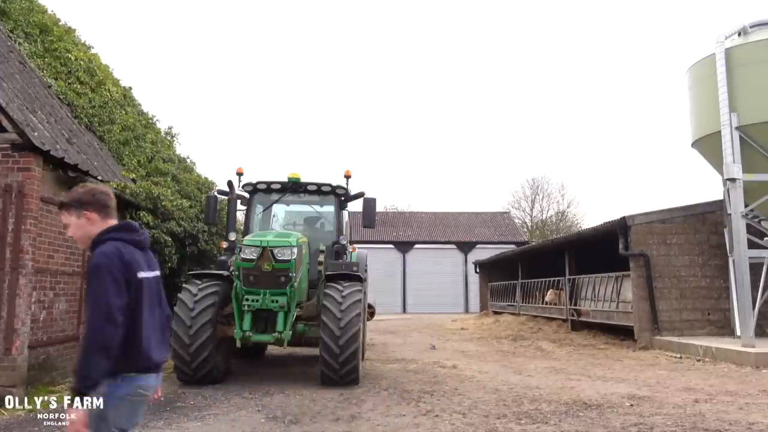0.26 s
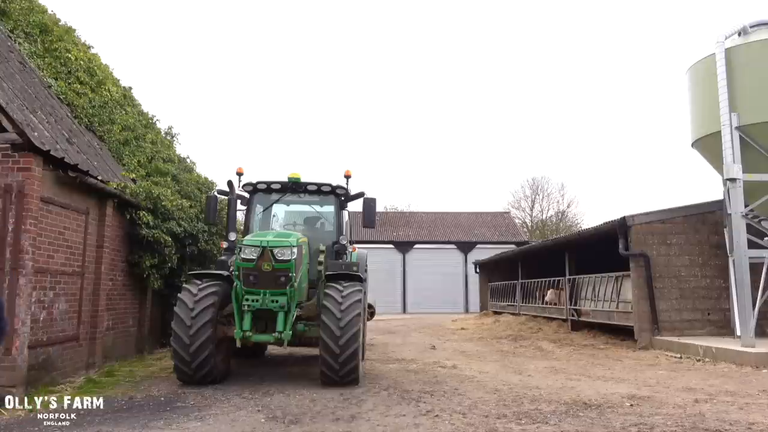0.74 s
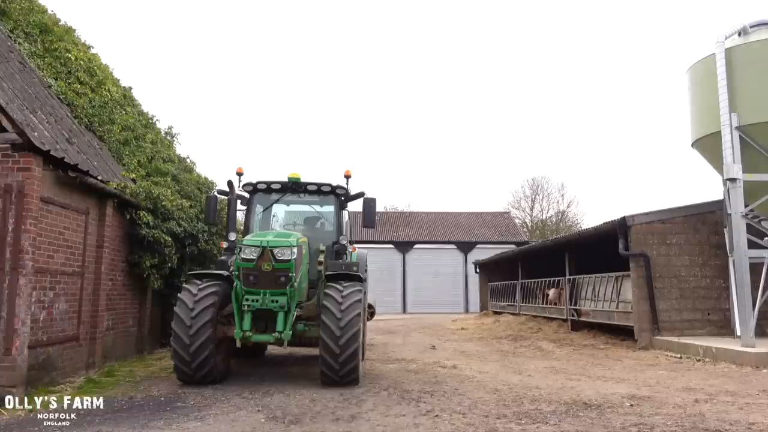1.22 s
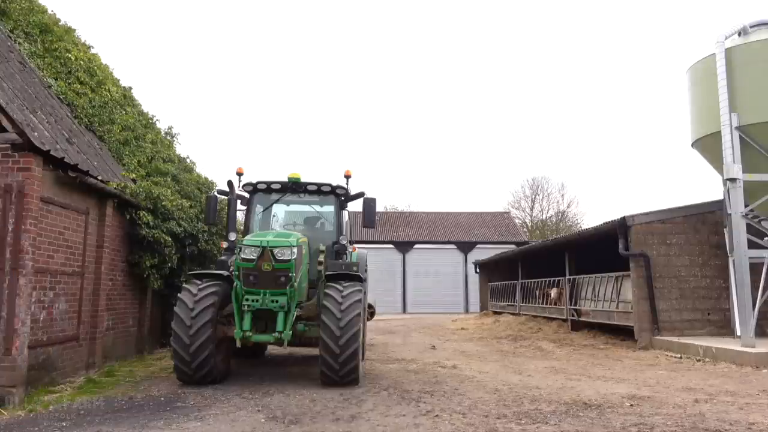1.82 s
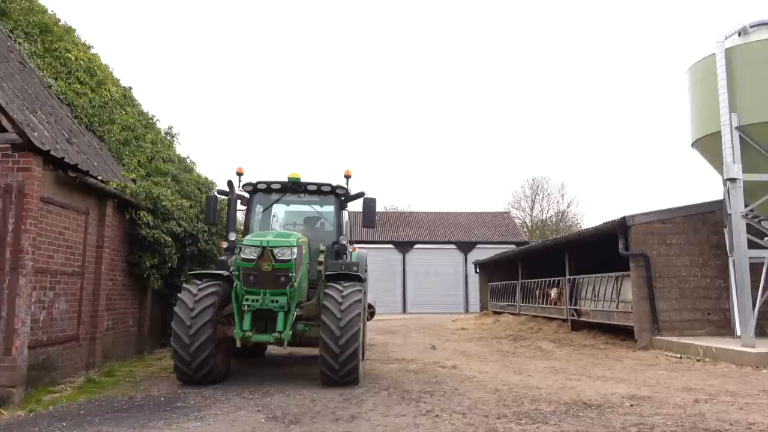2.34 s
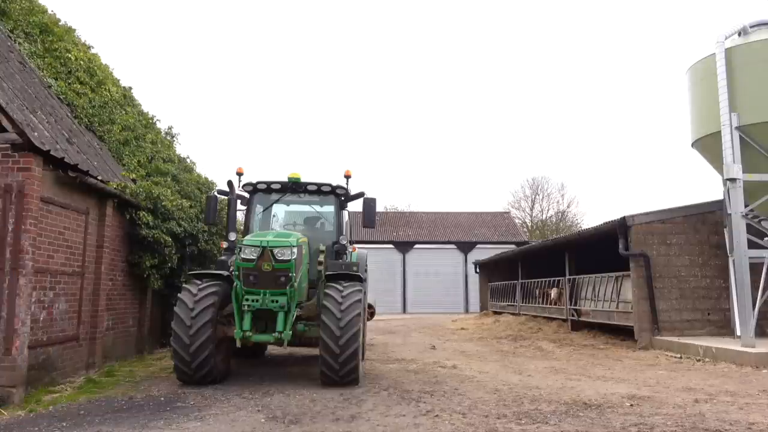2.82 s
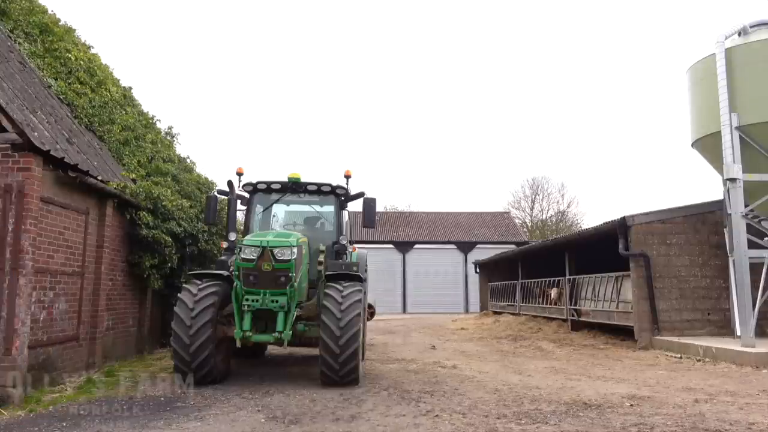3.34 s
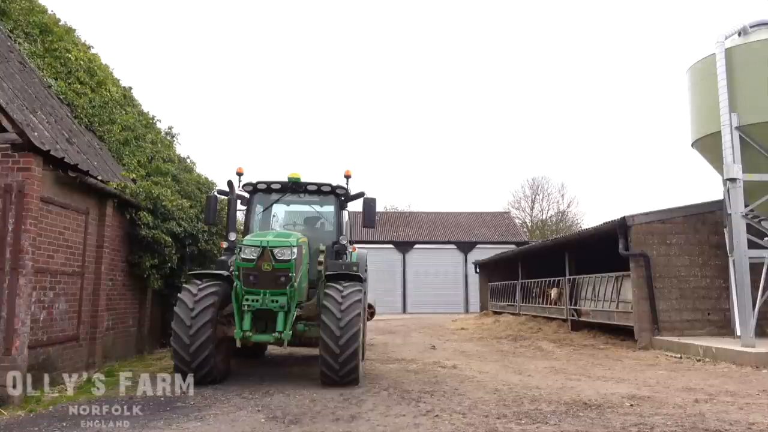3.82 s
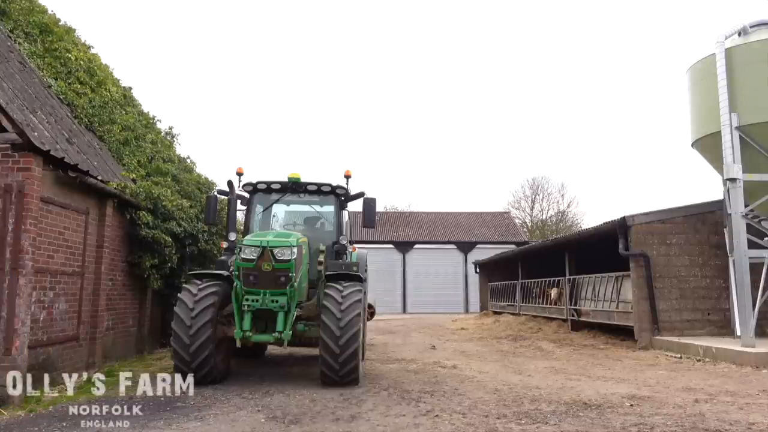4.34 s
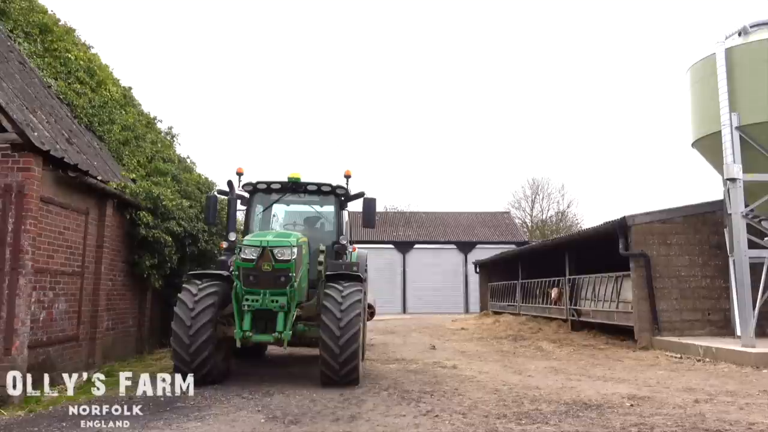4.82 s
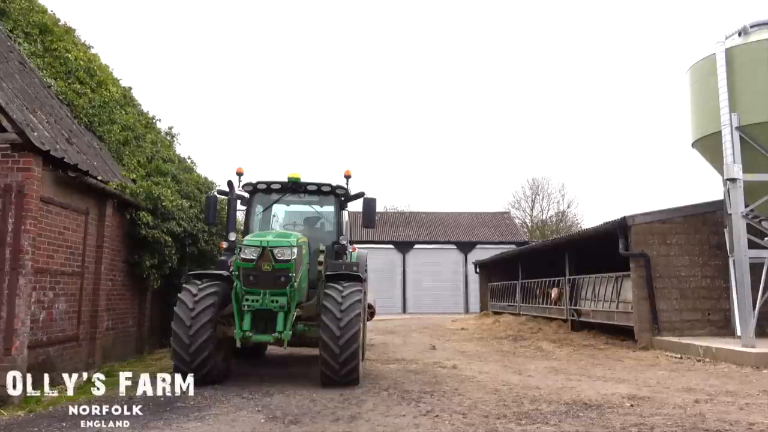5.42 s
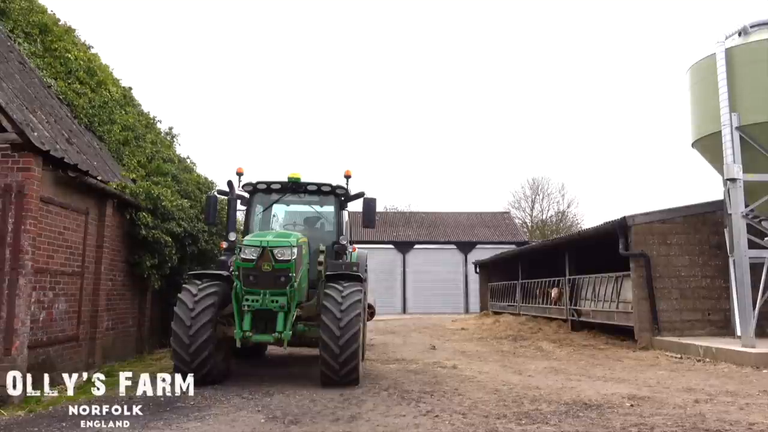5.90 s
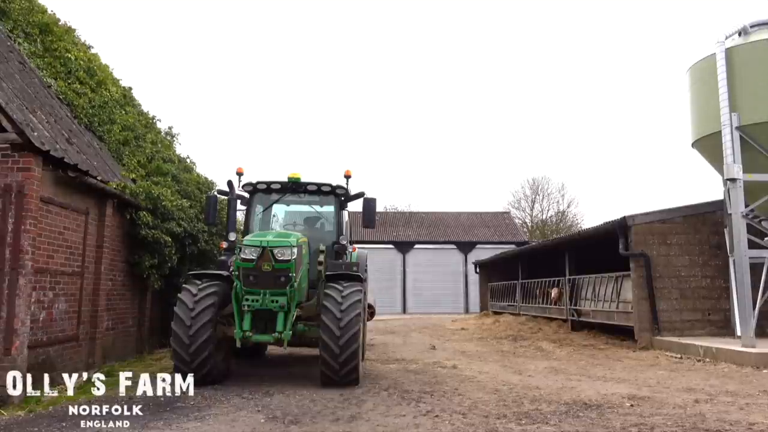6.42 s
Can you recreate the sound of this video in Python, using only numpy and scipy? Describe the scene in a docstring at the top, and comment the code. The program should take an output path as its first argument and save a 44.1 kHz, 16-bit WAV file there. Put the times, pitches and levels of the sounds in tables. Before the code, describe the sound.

Boots crunch over gritty concrete, then a cow gives one loud moo that echoes around a farmyard.

```python
"""A cow moos across a yard

One moo from an open cattle shed: vocal-fold pulses ring a closed-mouth hum that opens into a bright
bellow, and the yard's walls answer. Before it, close boots crunch over gritty concrete; after it,
something shuffles and rustles softly. A distant machine drones and far birds wheeze under airy hiss.
The recorder's gain control ducks at every loud sound, so the background sinks and creeps back."""
import sys
import numpy as np
from scipy import signal
from scipy.fft import rfft, irfft, next_fast_len
from scipy.io import wavfile
from scipy.ndimage import uniform_filter1d, minimum_filter1d

SR = 44100
rng = np.random.default_rng(int(sys.argv[2]) if len(sys.argv) > 2 else 0)


def to_wav(s):
    """Save 16-bit WAV."""
    ch = np.atleast_2d(s).T  # columns
    pcm = np.round(np.clip(ch, -1, 1) * 32767)  # PCM
    wavfile.write(sys.argv[1], SR, pcm.astype(np.int16))


N = 293706

# the moo breaks down to a low hum, climbs as the mouth opens, then sags: (time [s], pitch [Hz])
MOO_PITCH = [(2.04, 119.4), (2.28, 140.4), (2.315, 102.4), (2.436, 105.5), (2.59, 111.8), (2.682, 115.1),
             (2.755, 120.6), (2.92, 135.8), (3.006, 143.4), (3.15, 147.3), (3.266, 143.8), (3.416, 141.1),
             (3.45, 136.6), (3.498, 125.1), (3.56, 100.9)]
# it swells, then bursts open: (time [s], strength [dB], mouth opening [0-1], roughness [0-1])
MOO_EFFORT = [(2.04, -35.5, 0.03, 0.55), (2.17, -28, 0, 0.66), (2.38, -24.5, 0.12, 0.29),
              (2.6, -22, 0.28, 0.24), (2.755, -25, 0.43, 0.43), (2.795, -12, 0.64, 0.09),
              (2.92, -9.5, 0.5, 0.03), (3.06, -10, 1, 0.11), (3.25, -10.5, 0.97, 0.13),
              (3.46, -12.5, 0.89, 0.14), (3.55, -17.5, 0.9, 0.34)]
# its low end: (time [s], fundamental [dB], second harmonic [dB])
MOO_BOOM = [(2.04, -38.5, -41), (2.33, -26.5, -30.5), (2.54, -27, -26.5), (2.69, -20, -28),
            (2.75, -21, -33.5), (2.79, -26, -13.5), (2.86, -23.5, -11), (2.93, -33, -2.5),
            (2.98, -27, -4.5), (3.03, -24, -6), (3.08, -25.5, -5.5), (3.11, -41, -15.5), (3.17, -38.5, -7),
            (3.25, -37, -10), (3.32, -35, -3), (3.445, -24, 0), (3.48, -25.5, -8.5), (3.56, -39, -14)]
# the vocal tract with the mouth shut, half open and wide open: (frequency [Hz], gain [dB])
TRACT_SHUT = [(330, 10.5), (450, 4), (560, -6.5), (780, -6), (950, -3.5), (1300, -29), (1650, -2.5),
              (1970, 6), (2130, -6), (2450, -24.5), (2640, 3), (2930, -0.5), (3100, -49), (3900, -52),
              (4330, -44), (4800, -59), (6000, -63)]
TRACT_HALF = [(400, 3.5), (620, -13), (750, -6), (870, 3.5), (970, -7), (1080, 2.5), (1200, -19),
              (1350, -8), (1510, -1.5), (1670, -6), (1820, 0), (1930, 6), (2130, -19), (2420, -30),
              (2700, -15), (3000, -32), (3400, -36), (4700, -38), (6500, -46.5)]
TRACT_OPEN = [(430, -9), (720, -15.5), (870, -10.5), (1150, -6), (1320, -9.5), (1460, 4), (1595, 9),
              (1740, -2.5), (1880, 2.5), (2030, -0.5), (2180, -15), (2330, -17.5), (2860, -14), (3100, -23),
              (3950, -27), (5100, -58), (6300, -40), (8000, -52)]
# head resonances at the moo's highest pitch: (centre [Hz], width [Hz], gain [dB])
HEAD_RESONANCES = [(3310, 61, 14.6), (3600, 120, 6.6), (4290, 63, 21)]
# larger stones snapping under the soles: (time [s], level [dB], pitch [Hz])
STONE_SNAPS = [(0.016, -15, 1730), (.076, -18, 2010), (.093, -19.5, 6800), (0.13, -24, 4500),
               (0.139, -17, 2400), (0.167, -10.5, 3470), (.207, -14, 1750), (0.216, -20, 9000),
               (.509, -14, 3140), (0.574, -13, 11900), (.576, -16.5, 14000), (0.6, -8.5, 2800),
               (0.603, -20, 3000), (.604, -8.5, 7250), (.611, -18, 8000), (.628, -14, 2200),
               (0.635, -9.5, 2800), (.643, -12.5, 2150), (.659, -7.5, 1980), (.661, -5, 1030),
               (0.674, -7, 2370), (.689, -10, 2710), (.712, -18, 2500), (.964, -25, 6500), (.973, -7, 2740),
               (.976, -3.5, 2670), (1.102, -16.5, 10000), (1.104, -14.5, 3200), (1.141, -13, 1440),
               (1.148, -16.5, 6500), (1.177, -20.5, 6000), (1.246, -16, 4200), (1.252, 0.5, 2510),
               (1.254, -1.5, 1630), (1.28, -11.5, 1740), (1.326, -17, 1700), (1.351, -15.5, 2320),
               (1.351, -18.5, 11000), (1.396, -12, 1940), (1.422, -17, 1400), (1.638, -15, 10900),
               (1.644, -13, 10000), (1.65, -16, 2620), (1.883, -15, 1270), (2.031, -22, 6000),
               (2.106, -21, 5040), (2.216, -10.5, 4040), (2.802, -19.5, 5500), (4.494, -20, 2022),
               (5.262, -25, 1500), (5.354, -24, 3970)]
# heels landing: (time [s], level [dB], pitch [Hz])
HEEL_THUDS = [(.078, -18.5, 229), (.189, -16, 234), (.347, -24, 156), (1.14, -17.5, 268),
              (1.204, -19.5, 190), (5.233, -21.5, 245)]
# soles scraping: (time [s], nominal length [s], level [dB], pitch [Hz], grittiness [dB], attack [s])
SOLE_SCRAPES = [(0.116, 0.1, -33, 2920, 5, 0.0064), (0.572, 0.022, -31, 3800, 9, 0.0026),
                (0.623, 0.09, -31.5, 2490, 2.5, 0.014), (0.956, 0.078, -33.5, 2540, 8, .01),
                (1.102, 0.031, -31.5, 4370, 5, .004), (1.132, 0.093, -31.5, 2630, 4, .015),
                (1.274, 0.047, -32.5, 1740, 6, 0.0056), (1.634, 0.09, -32, 2870, 5, 0.0075),
                (2.09, 0.057, -27.5, 4960, 4.5, 0.0046), (2.153, 0.064, -34, 4400, 3, 0.0065),
                (2.715, 0.053, -40, 4550, 8.5, .008), (5.313, 0.067, -30, 4100, 3, 0.029),
                (5.522, 0.066, -35, 2600, 3, 0.023), (6.349, 0.07, -34, 4500, -4, 0.026)]
# tone colour of the snaps and of the scrapes: (frequency [Hz], gain [dB])
STONE_EQ = [(1500, 2), (3100, 1.5), (5000, -4.5), (6400, 1), (8000, 0), (9500, -4.5), (16000, -6)]
SOLE_EQ = [(100, -35), (400, 4), (900, 9), (2500, 3), (3700, 0.5), (5200, -2.5), (6500, -3), (7900, -2.5),
           (9300, -6.5), (16000, -7.5)]
# dull shuffles: (time [s], fade time [s], level [dB])
SHUFFLES = [(0.145, 0.36, -37.5), (1.62, 0.97, -42), (4.468, 1, -38), (5.154, 0.31, -41.5),
            (5.706, 0.11, -39), (6.44, 0.53, -28.5)]
# tone colour of the shuffles, the rustle and the open air: (frequency [Hz], gain [dB])
SHUFFLE_EQ = [(30, -27), (70, 3), (180, 16), (260, 5), (380, 0), (520, 1.5), (750, -26), (2000, -49)]
RUSTLE_EQ = [(300, -37), (2000, -1.5), (6000, 2), (13000, -5.5), (16000, -7)]
AIR_EQ = [(15, -54), (25, -17), (102, -0.5), (269, -3), (392, -6.5), (486, -0.5), (791, -9.5), (981, -18.5),
          (1250, -12.5), (2150, -13.5), (2590, -16), (2810, -15.5), (6660, -24.5), (12400, -29.5),
          (15800, -31.5)]
# far birds: (time [s], length [s], start pitch [Hz], end pitch [Hz], level [dB], flutter depth [Hz])
BIRD_CALLS = [(0.361, 0.25, 3400, 3770, -42, 124), (.83, 0.2, 4210, 4200, -52, 15),
              (1.87, 0.21, 4180, 4230, -54, 25), (4.648, 0.19, 2043, 2103, -38, 170),
              (5.001, 0.229, 2056, 2176, -41, 177), (5.571, 0.24, 3570, 3820, -39, 124),
              (6.519, 0.23, 3360, 3940, -45.5, 110)]
# the far machine's tones: (centre [Hz], width [Hz], level [dB])
MACHINE_TONES = [(494, 19.5, -43.5), (1017, 143, -48.5), (1596, 130, -51.5), (2240, 20, -67.5),
                 (4260, 19, -62)]
# slaps off nearby rails and posts, and echoes off the far buildings: (delay [s], level [dB])
NEAR_ECHOES = [(0.035, -28.5), (.071, -22.5), (.125, -31)]
FAR_ECHOES = [(.18, -18.5), (.36, -28.5)]
# the yard's reverb: (frequency [Hz], time to fall 60 dB [s])
YARD_T60 = [(120, 0.84), (300, 0.86), (1500, 0.53), (4000, 0.51), (12000, 0.023)]
# stereo width by frequency: (frequency [Hz], side gain [dB])
STEREO_WIDTH = [(60, -4), (250, -1.5), (600, 2.5), (2000, 2.5), (4200, 3.5), (6500, 3), (9000, -15.5),
                (16000, -11.5)]

MOO_START_S, MOO_END_S, MOO_FADE_S = 2.02, 3.575, 0.05
HUM_HZ = 108  # pitch of the relaxed voice
THROAT_DB, THROAT_DB_PER_HZ = -3, 0.0334  # throat band against the strength; it grows with pitch
TOP_HZ = 16000


def cow(jitter=0.015, lurch=0.72, split_hz=1300):
    """Vocal-fold pulses ring a tract that opens from a nasal hum to a bellow."""
    pitch, = curves(MOO_PITCH)
    first_db, second_db = curves(MOO_BOOM)
    strength_db, *shares = curves(MOO_EFFORT)
    opening, rough = np.clip(shares, 0, 1)
    phase = 2 * np.pi * np.cumsum(pitch * (1 + jitter * rough * wobble(90))) / SR
    voice = stall(vocal_tract(vocal_folds(phase, pitch, rough), opening, pitch))
    voice = filtered(voice, lambda f: 1 - 1 / (1 + (f / 260) ** 6))
    # the throat band and the bright band above it each ride their own fader
    throat = filtered(voice, lambda f: 1 / (1 + (f / split_hz) ** 20))
    throat_db = strength_db + THROAT_DB + THROAT_DB_PER_HZ * (pitch - HUM_HZ)
    upper = amp(throat_db) * steady(throat) + amp(strength_db) * steady(voice - throat)
    # the two lowest harmonics are voiced apart, free of hiss
    lower = np.sqrt(2) * (amp(first_db) * np.sin(phase) + amp(second_db) * np.sin(2 * phase))
    lower *= 1 + lurch * rough * wobble(70)
    t = np.arange(N) / SR
    sounding = np.clip(np.minimum(t - MOO_START_S, MOO_END_S - t) / MOO_FADE_S, 0, 1)
    return -sounding * (upper + lower)  # each closing of the folds is a drop in pressure


def vocal_folds(phase, pitch, rough, shimmer=0.21, top_hz=7000, uneven_hz=2190):
    """One sharp pulse a cycle; slack folds beat unevenly, and air hisses through as they part."""
    harmonics = int(top_hz / pitch.max())
    pulses = np.sin((harmonics + .5) * phase) / (2 * np.sin(phase / 2)) - .5
    pulses = pulses - np.cos(phase) - np.cos(2 * phase)  # third harmonic and up
    hiss = unit(rng.standard_normal(N) * (1 + np.cos(phase)) ** 2)
    buzz = unit(pulses) * (1 + shimmer * rough * wobble(130)) + rough * hiss
    # the high overtones swell and fade one by one
    overtones = filtered(buzz, lambda f: 1 - 1 / (1 + (f / uneven_hz) ** 12))
    return buzz - overtones + patchy(overtones, depth_db=4, size=2048)


def vocal_tract(buzz, opening, pitch, follow=.15, wander=0.0098):
    """Three mouth shapes crossfade; head resonances follow the pitch and drift with tongue and jaw."""
    mouth = sum(np.maximum(0, 1 - np.abs(2 * opening - k)) * resonate(buzz, shape)
                for k, shape in enumerate([TRACT_SHUT, TRACT_HALF, TRACT_OPEN]))
    bend = (pitch / pitch.max()) ** follow
    head = sum(amp(db) * glide(mouth, hz * bend * (1 + wander * wobble(8)), width)
               for hz, width, db in HEAD_RESONANCES)
    return mouth + head


def stones(t60=0.015, bandwidth=0.67, dull_ratio=.32, top_ratio=4.7):
    """A stone cracks under the boot, then crumbles for a few milliseconds."""
    out = np.zeros(N)
    t = np.arange(SR // 40) / SR
    for s, db, hz in STONE_SNAPS + crumbs():
        crack = .5 * rng.standard_normal(len(t)) * amp(-60 * t / t60)
        crack[0] += 2
        snap = band(crack, hz, bandwidth * hz)
        # the treble rolls off gently at first, then steeply
        dull_hz, top_hz = dull_ratio * hz, top_ratio * hz
        snap = filtered(snap, lambda f: amp(along(STONE_EQ, f)) * f / (f + hz / 2)
                        / (1 + 1j * f / dull_hz))
        snap = filtered(snap, lambda f: 1 / np.sqrt(1 + (f / top_hz) ** 4))
        add(out, s, amp(db) * snap / np.abs(snap).max())
    return out


def crumbs(count=3, lift_db=0.5, hz=3000, scatter_octaves=0.41):
    """Each scrape crushes a few small stones at random: (time [s], level [dB], pitch [Hz])."""
    return [(s + length * rng.random(), db + grain_db + lift_db,
             min(hz * 2 ** (scatter_octaves * rng.normal()), TOP_HZ))
            for s, length, db, _, grain_db, _ in SOLE_SCRAPES for _ in range(count)]


def heels(t60=0.021, attack_s=0.0022):
    """Each heel lands with a short, low thud."""
    out = np.zeros(N)
    t = np.arange(SR // 4) / SR
    for s, db, hz in HEEL_THUDS:
        thud = np.sin(2 * np.pi * hz * t) * amp(-60 * t / t60) * (1 - np.exp(-t / attack_s))
        add(out, s, amp(db) * thud / np.abs(thud).max())
    return out


def soles(bandwidth=0.81, dust_db=-14):
    """Grit catches and lets go under the sole every few milliseconds; fine dust adds a broad hiss."""
    out = np.zeros(N)
    t = np.arange(SR // 4) / SR
    for s, length, db, hz, grain_db, attack in SOLE_SCRAPES:
        grains = rng.standard_normal(len(t)) * amp(grain_db * np.tanh(wobble(603)[:len(t)] - .5))
        grit = unit(band(grains, hz, bandwidth * hz))
        dust = amp(dust_db) * unit(band(grains, 2 * hz, 2 * hz))
        stroke = np.interp(t / length, [0, .6, 1.3], [1.2, .75, 0]) * np.clip(t / attack, 0, 1)
        add(out, s, amp(db) * stroke * (grit + dust))
    return resonate(out, SOLE_EQ)


def shuffling(attack_s=0.06, fade_db=8.5):
    """Dull shuffles: dark noise that rises quickly and drops by fade_db over each fade time."""
    t = np.arange(N) / SR
    moves = sum(np.clip((t - s) / attack_s, 0, 1) * amp(db - fade_db * np.abs(t - s) / fade_s)
                for s, fade_s, db in SHUFFLES)
    return spread(moves * noise_pair(SHUFFLE_EQ), side_db=-8.5)


def rustle(start_s=3.99, rise_s=0.83, level_db=-44.5, flutter_db=1.5):
    """A soft, uneven rustle fades in after the moo and stays."""
    fade_in = np.clip((np.arange(N) / SR - start_s) / rise_s, 0, 1)
    level = fade_in * amp(level_db + flutter_db * wobble(17))
    return spread(level * patchy(noise_pair(RUSTLE_EQ), depth_db=2.5), side_db=-8.5)


def birds():
    """Thin whistles, blurred into wheezes by a fast random flutter of pitch."""
    out = np.zeros(N)
    for s, length, start_hz, end_hz, db, flutter_hz in BIRD_CALLS:
        progress = np.linspace(0, 1, int(length * SR))
        sweep = start_hz + (end_hz - start_hz) * np.sqrt(progress)
        pitch = sweep + flutter_hz * wobble(700)[:len(progress)]
        whistle = np.sqrt(2) * np.sin(2 * np.pi * np.cumsum(pitch) / SR)
        add(out, s, amp(db) * np.sin(np.pi * progress) * whistle)
    return out


def machine(gain_db=2.0):
    """The far machine's fuzzy tones, narrow bands of noise arriving from all sides."""
    drone = np.zeros((2, N))
    for hz, width, db in MACHINE_TONES:
        tone = band(rng.standard_normal((2, N)), hz, 1.6 * width)
        drone += amp(db) * unit(band(tone, hz, 1.6 * width))  # two wide passes make one narrow band
    return amp(gain_db) * spread(drone, side_db=-7.0)


def air(level_db=-37, drift_db=0.96):
    """A bed of open-air hiss whose level drifts gently."""
    level = amp(level_db + drift_db * wobble(3.0))
    hiss = filtered(rng.standard_normal((2, N)), lambda f: amp(along(AIR_EQ, f)) * f / (f + 30))
    return spread(level * unit(hiss), side_db=-9.5)


def stall(x, scatter_db=1, scatter_hz=1700, t60=0.093):
    """Rails, posts and roof smear each pulse into a short spray, mostly in the treble."""
    t = np.arange(SR // 10) / SR
    spray = rng.standard_normal(len(t)) * amp(-60 * t / t60)
    smeared = signal.oaconvolve(x, spray / np.linalg.norm(spray))[:N]
    return x + amp(scatter_db) * filtered(smeared, lambda f: f * f / (f * f + scatter_hz ** 2))


def echoes(x, thin_hz=550, dark_hz=1200):
    """Rails and posts slap back thin in the bass; the far buildings answer later and darker."""
    near = filtered(delays(x, NEAR_ECHOES), lambda f: 1 - 1 / (1 + (f / thin_hz) ** 4))
    return near + filtered(delays(x, FAR_ECHOES), lambda f: 1 / (1 + 1j * f / dark_hz))


def yard(x, build_s=0.016):
    """The buildings' diffuse reverb tail, treble dying first."""
    hz, t, noise = signal.stft(rng.standard_normal((2, SR)), SR, nperseg=256)
    decay = amp(-60 * t / along(YARD_T60, hz)[:, None])
    tail = signal.istft(noise * decay * (1 - np.exp(-t / build_s)), SR, nperseg=256)[1]
    tail = spread(tail / np.linalg.norm(tail[0]), side_db=-16.0)
    return signal.fftconvolve(x[None], tail, axes=1)[:, :N]


def stereo_width(x):
    """The image is wide in the mids and presence range, nearly mono in the top treble."""
    mid, side = (x[0] + x[1]) / 2, (x[0] - x[1]) / 2
    return spread([mid, filtered(side, lambda f: amp(along(STEREO_WIDTH, f)))], side_db=0)


def gain_control(x, threshold_db=-15, ratio=1.81, release_db_per_s=7, attack_s=0.0025):
    """The gain ducks at once on a peak over the threshold and recovers at a steady rate."""
    over_db = np.maximum(20 * np.log10(np.abs(x).max(axis=0) + 1e-9) - threshold_db, 0)
    recovery_db = release_db_per_s * np.arange(N) / SR
    cut_db = np.maximum.accumulate(over_db * (1 - 1 / ratio) + recovery_db) - recovery_db
    width = int(attack_s * SR)
    return x * amp(uniform_filter1d(minimum_filter1d(-cut_db, width), width))


def amp(db):
    """Decibels to gain."""
    return 10 ** (np.asarray(db) / 20)


def unit(x):
    """Scale to rms 1."""
    return x / np.sqrt(np.mean(x ** 2) + 1e-20)


def steady(x, window_s=0.047):
    """x with its running rms held at 1."""
    return x / np.sqrt(np.abs(uniform_filter1d(x * x, int(window_s * SR))) + 1e-12)


def along(points, hz):
    """Read (frequency [Hz], value) points on a log axis."""
    f, v = np.transpose(points)
    return np.interp(np.log(hz + 1), np.log(f + 1), v)


def curves(rows):
    """An automation curve for each column after the time."""
    s, *cols = np.transpose(rows)
    return [np.interp(np.arange(N) / SR, s, c) for c in cols]


def wobble(rate):
    """A smooth random curve, rate knots a second."""
    return signal.resample(rng.standard_normal(int(N * rate / SR) + 4), next_fast_len(N))[:N]


def noise_pair(eq):
    """Two independent noises of one tone colour."""
    return unit(filtered(rng.standard_normal((2, N)), lambda f: amp(along(eq, f))))


def patchy(x, depth_db, size=256):
    """Louder and softer patches in time and pitch; a larger size makes them narrower and slower."""
    spectrum = signal.stft(x, nperseg=size)[2]
    field = uniform_filter1d(rng.standard_normal(spectrum.shape[-2:]), size=6, axis=0)
    field = unit(uniform_filter1d(field, size=16, axis=1))
    mottled = signal.istft(spectrum * amp(depth_db * field), nperseg=size)[1]
    return np.std(x) * unit(mottled[..., :N])


def filtered(x, response):
    """x through a frequency response."""
    n = x.shape[-1]
    m = next_fast_len(n + min(n, SR // 4))
    return irfft(rfft(x, m) * response(np.fft.rfftfreq(m, 1 / SR)), m)[..., :n]


def resonate(x, eq, size=4096):
    """Minimum-phase EQ: each pulse rings after it strikes."""
    cepstrum = irfft(np.log(amp(along(eq, np.fft.rfftfreq(size, 1 / SR)))))
    cepstrum[1:size // 2] *= 2
    cepstrum[size // 2 + 1:] = 0
    return signal.oaconvolve(x, irfft(np.exp(rfft(cepstrum))))[:N]


def band(x, hz, width_hz):
    """One causal resonance."""
    return filtered(x, lambda f: 1j * f * width_hz / (hz * hz - f * f + 1j * f * width_hz))


def glide(x, hz, width_hz):
    """One resonance whose centre moves with time."""
    turn = np.exp(2j * np.pi * np.cumsum(hz) / SR)
    keep = np.exp(-np.pi * width_hz / SR)
    return 2 * (turn * signal.lfilter([1 - keep], [1, -keep], x / turn)).real


def delays(x, taps):
    """Delayed, weaker copies of x."""
    out = np.zeros(N)
    for delay, db in taps:
        add(out, delay, amp(db) * x)
    return out


def spread(pair, side_db):
    """Two signals as the mid and side of a stereo pair."""
    side = amp(side_db) * pair[1]
    return np.array([pair[0] + side, pair[0] - side])


def add(track, s, sound):
    """Mix a sound into a track at time s."""
    part = track[..., max(0, round(s * SR)):][..., :sound.shape[-1]]
    part += sound[..., :part.shape[-1]]


def scene():
    """The cow a little to the right, the boots and the birds to the left."""
    moo = cow()
    boots = stones() + heels() + soles()
    # the yard rings most in the midrange
    send = filtered(moo, lambda f: f / np.hypot(f, 300) / (1 + 1j * f / 3200))
    far = amp(-4.5) * (moo + echoes(moo)) * amp([[-.4], [.4]]) + amp(-15.5) * yard(send)
    near = boots * amp([[1], [-1]]) + amp(-17) * yard(boots)
    calls = np.array([birds(), birds()]) * amp([[2], [-1]])  # scattered by the walls, unlike in each ear
    calls += amp(-5) * yard(birds())
    return far + near + calls + air() + machine() + shuffling() + rustle()


def record(dry, low_cut_hz=40):
    """Stereo width, gain control, a bass roll-off, and nothing above the band limit."""
    ducked = gain_control(stereo_width(dry))
    return filtered(ducked, lambda hz: hz ** 2 / (hz ** 2 + low_cut_hz ** 2) * (hz < TOP_HZ))


dry = scene()
out = record(dry)
to_wav(out)
```